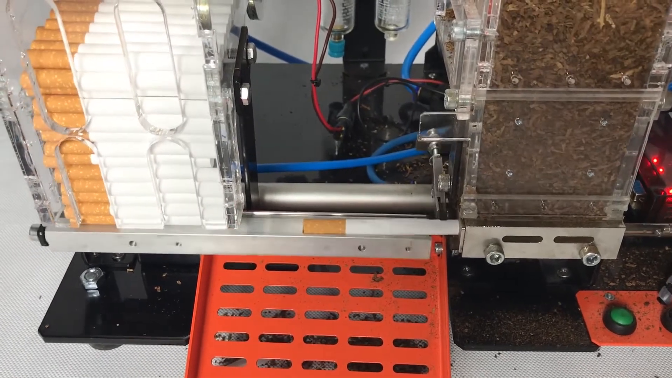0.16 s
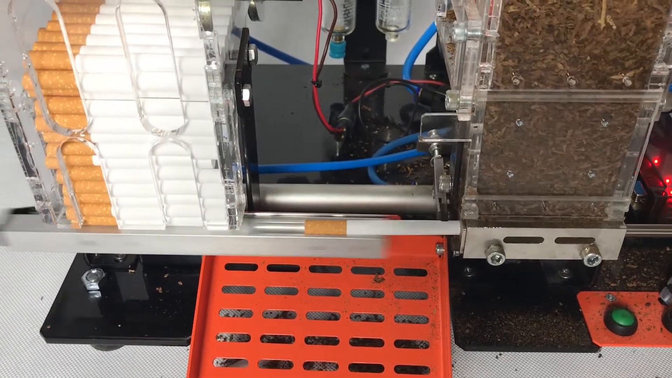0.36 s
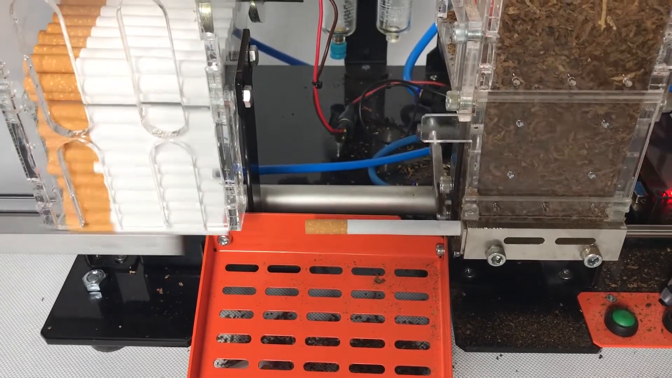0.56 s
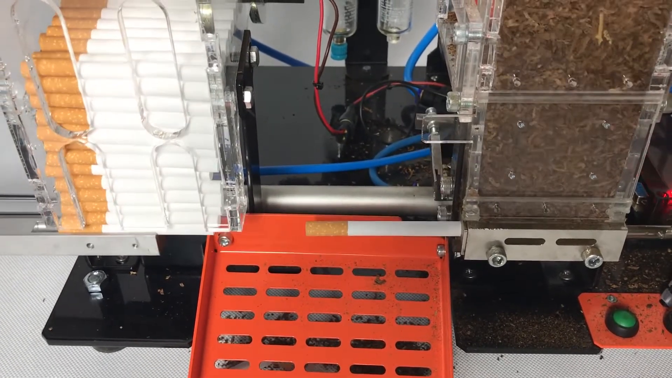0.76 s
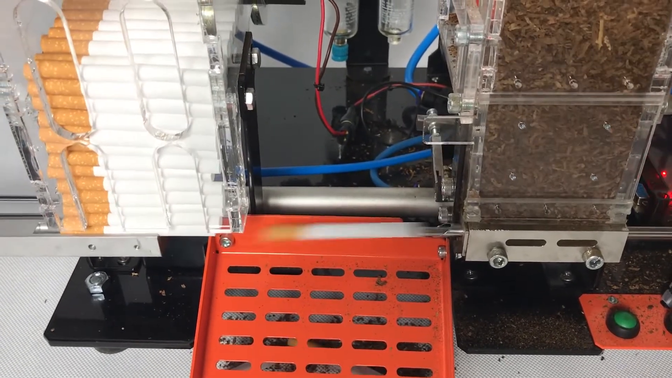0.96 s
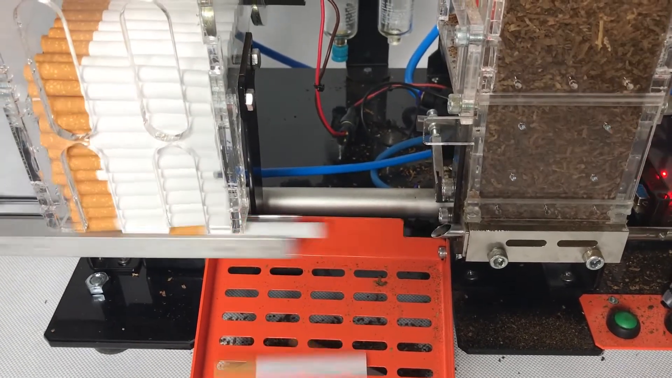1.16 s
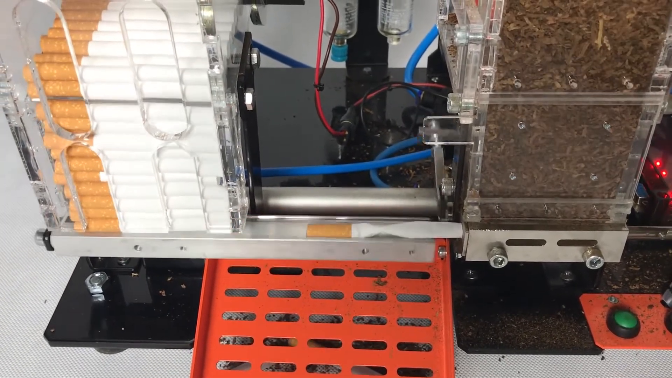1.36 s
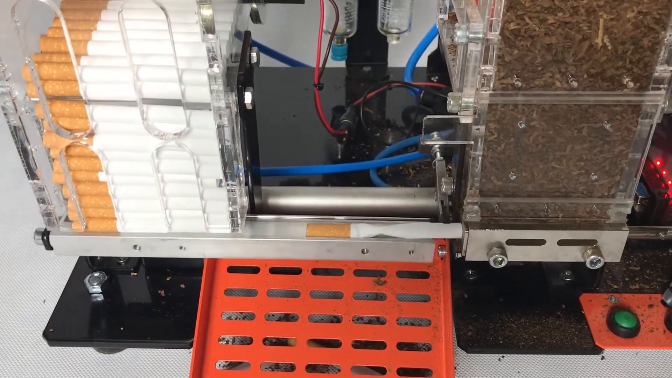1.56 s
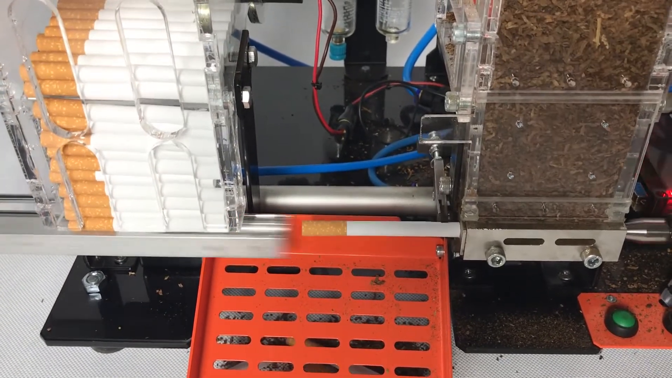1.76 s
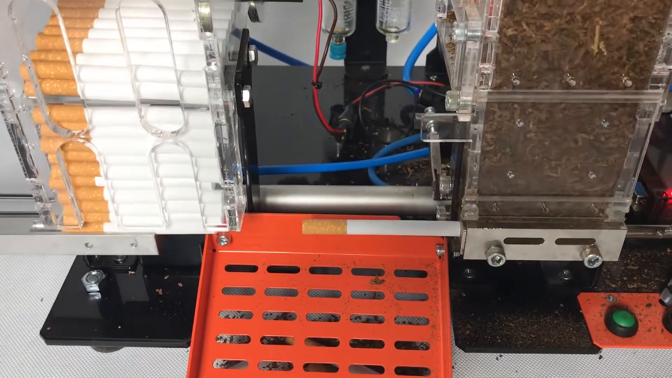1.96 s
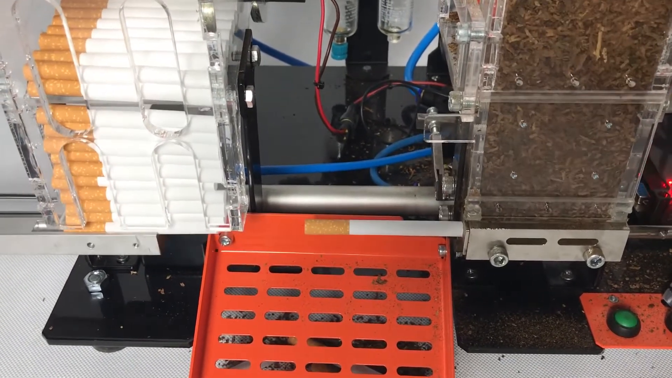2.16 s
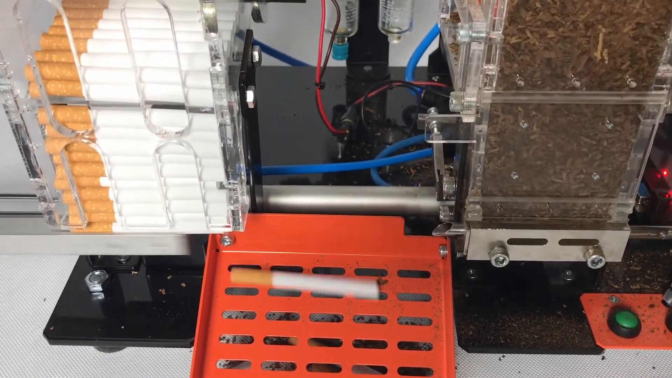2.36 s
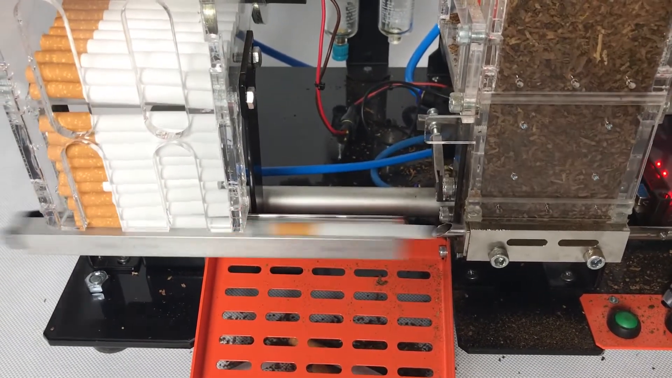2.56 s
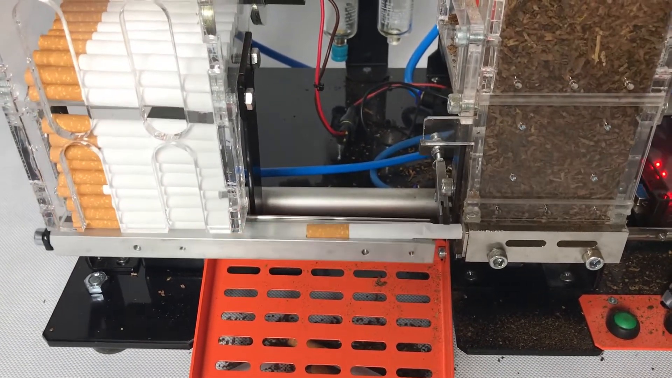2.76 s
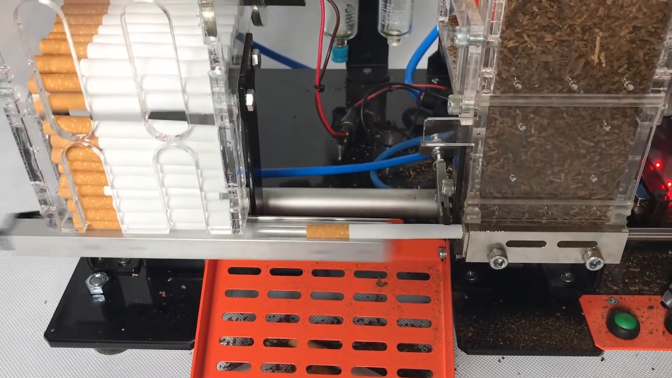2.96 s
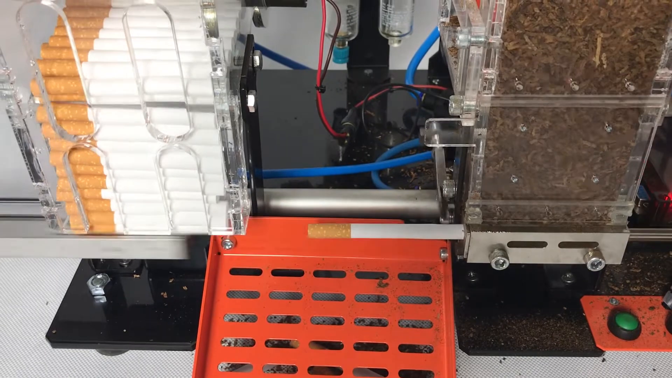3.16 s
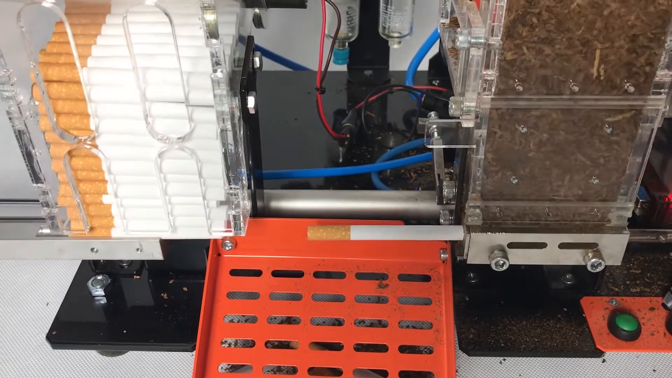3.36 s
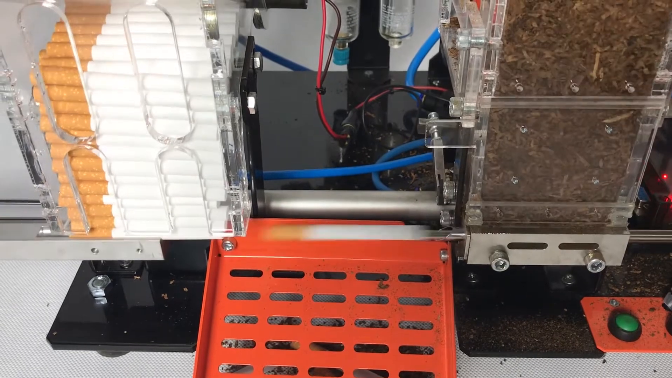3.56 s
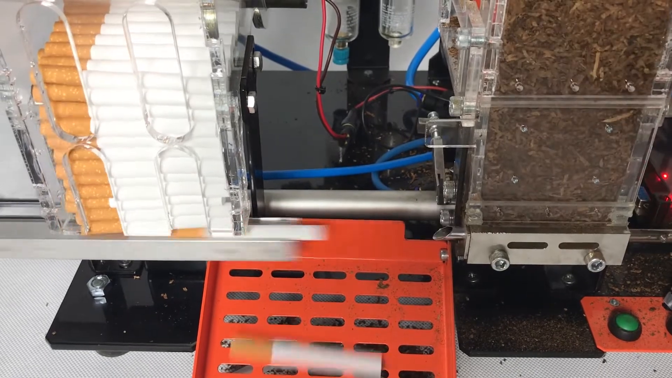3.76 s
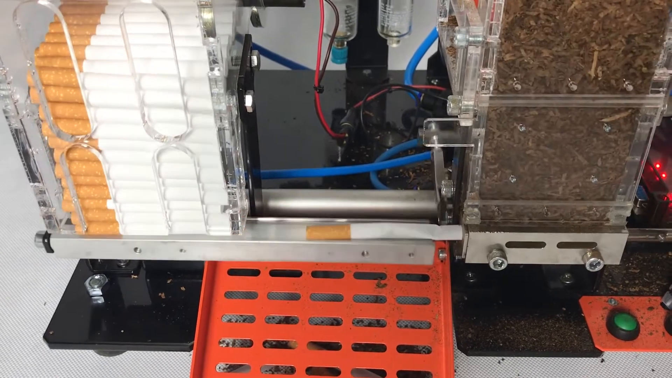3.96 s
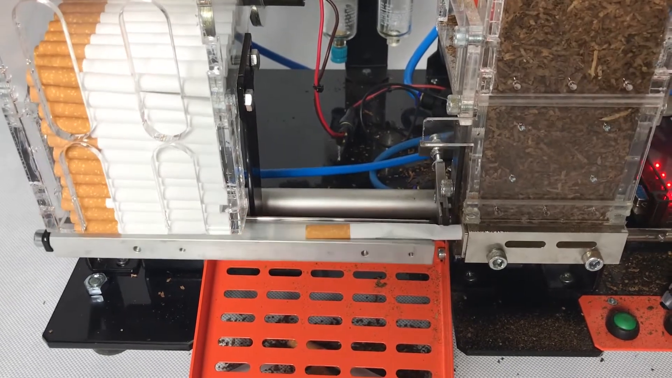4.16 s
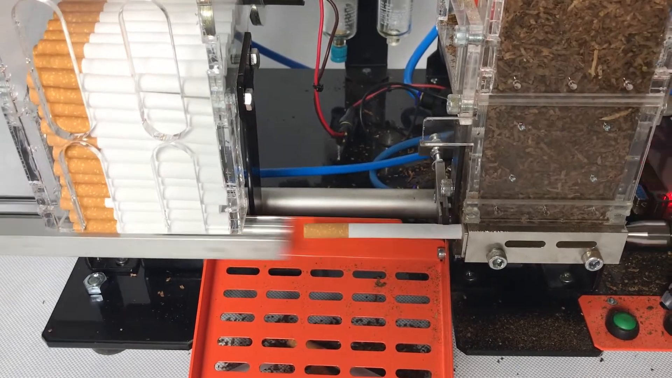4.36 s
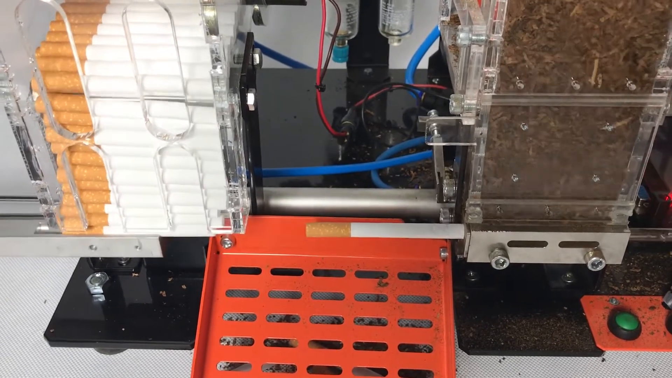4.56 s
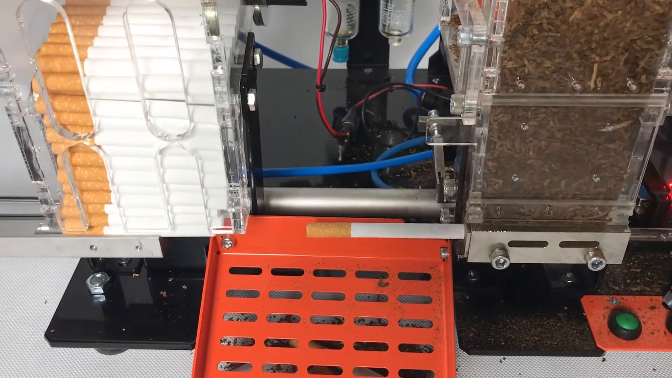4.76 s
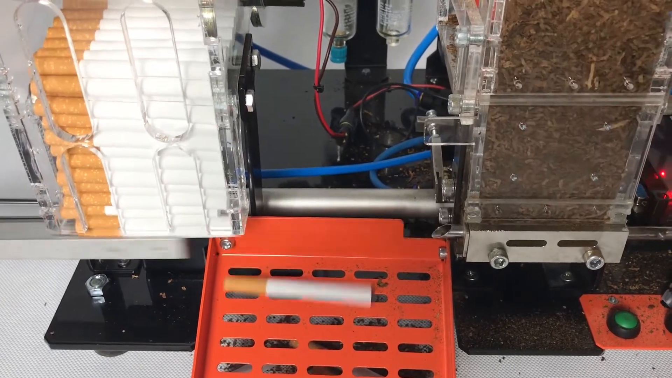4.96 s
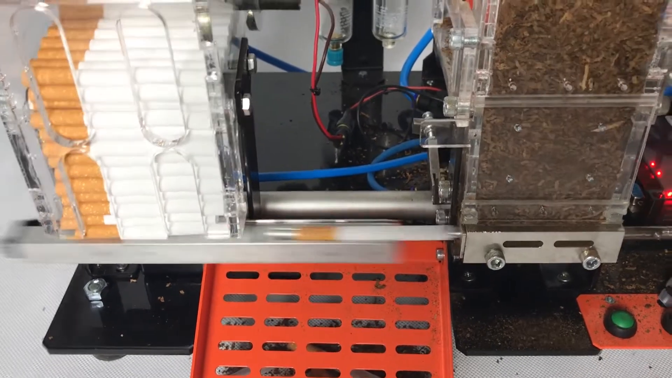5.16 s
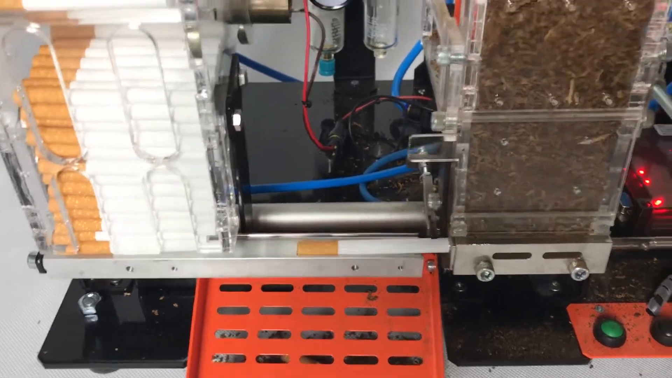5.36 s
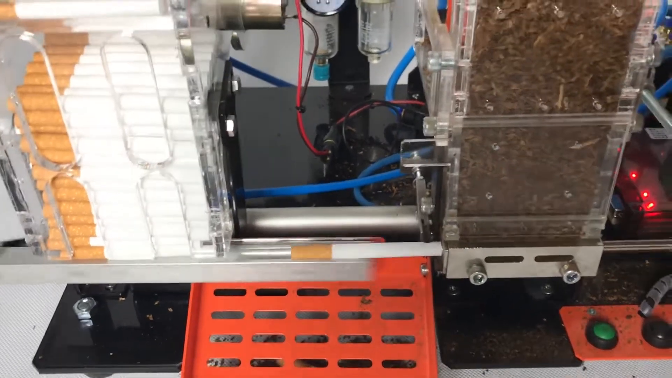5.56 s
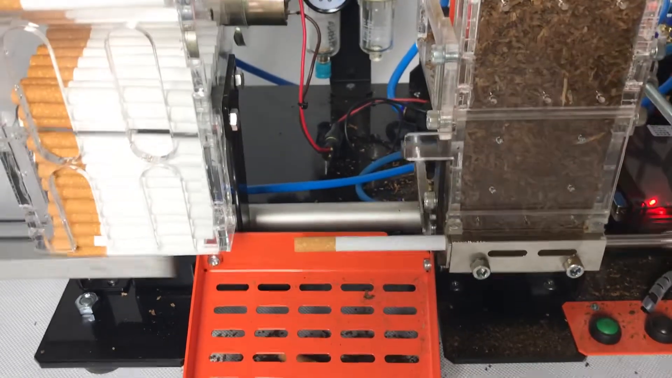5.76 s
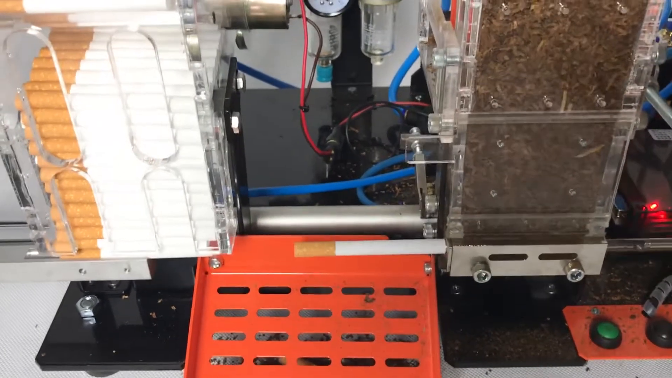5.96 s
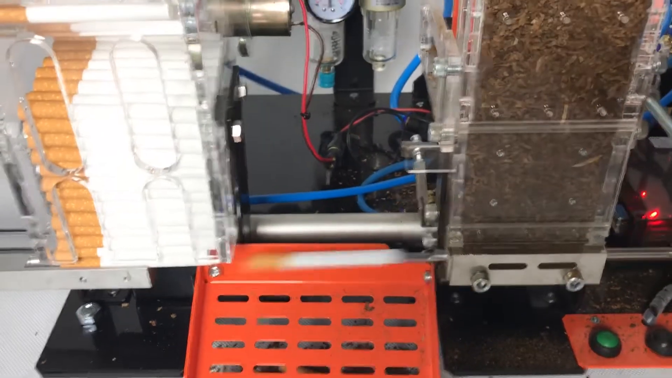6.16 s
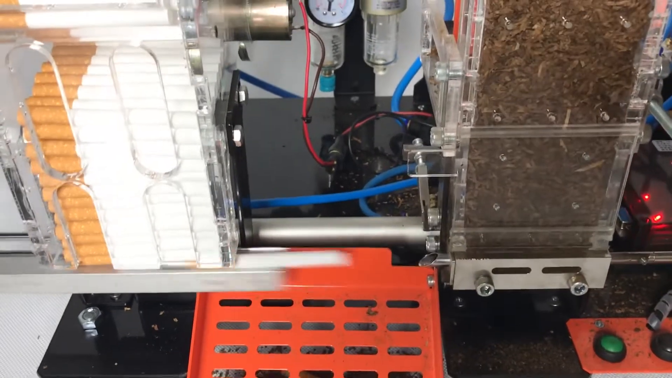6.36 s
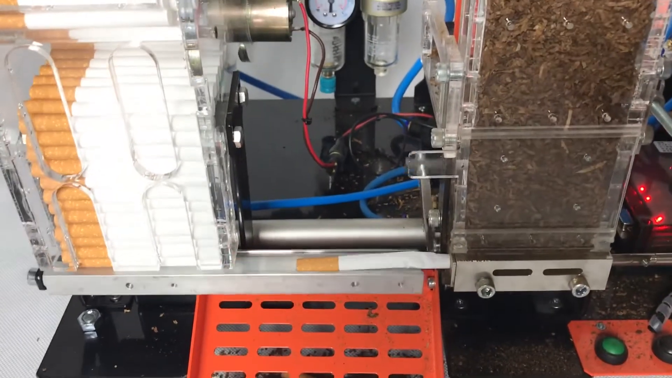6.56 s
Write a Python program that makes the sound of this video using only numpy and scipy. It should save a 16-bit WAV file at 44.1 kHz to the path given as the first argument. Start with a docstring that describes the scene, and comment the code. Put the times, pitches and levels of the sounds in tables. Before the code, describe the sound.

A small pneumatic tube-filling machine clacks and hisses in a fast, even 1.3-second cycle, pistons slamming, valves snapping, air blasting over a faint whine.

```python
"""A steady faint rush and whine come first and persist: filtered noise and wavering sines.
A small pneumatic cigarette-tube filler, close to a mono microphone, repeats a cycle every 1.3 s.
Feed and return air (shaped noise) opens the excerpt; valves snap, the slide rattles on its rails and
paper tubes tick in the hopper (noise bursts, most of them exciting damped modes).
Then cylinders vent in blasts, pistons slam into their stops and rebound, and pushing air follows."""
import sys
import numpy as np
from scipy import signal
from scipy.fft import rfft, irfft, next_fast_len
from scipy.io import wavfile
from scipy.ndimage import uniform_filter1d

SR = 44100
rng = np.random.default_rng(int(sys.argv[2]) if len(sys.argv) > 2 else 0)


def bounce(signal):
    """Save signal as a 16-bit WAV file at the path given by the first command-line argument."""
    frames = np.transpose(np.atleast_2d(signal))
    limited = np.clip(frames, -1, 1)
    pcm = np.round(limited * 32767).astype(np.int16)
    wavfile.write(sys.argv[1], SR, pcm)


N = 291942

CYCLE_S = 1.30007
CYCLE_STARTS_S = np.arange(-1, 5) * CYCLE_S  # event times below are those of one cycle
BLOW_SIZE = 8192  # samples
BLOW_S = 0.01  # a blow's level is its energy spread over this time
EDGE_HZ = 15800  # upper band limit

# Idling machine, noise density before scaling: f/Hz, level/dB per Hz
IDLE_SPECTRUM = [(24, -41), (40, -20), (68, 1.5), (105, -11.5), (402, -9), (529, 0), (790, -7), (965, 0),
                 (1070, -5.5), (1300, -2), (3060, -21), (3830, -5), (4130, -25), (12100, -32), (16000, -20)]
# Motor lines, before the common whine gain: f/Hz, level/dB
WHINE_LINES = [(947.5, -43.5), (1324, -64), (3817, -52.5)]
# Air flows: opening t/s, closing t/s, level/dB, sag/dB per s (negative: swells), dying time/s
FEED_FLOWS = [(1.13, 1.385, -33.5, -24, 0.006)]
RETURN_FLOWS = [(1.387, 1.545, -24, 11, 0.038)]
BLAST_FLOWS = [(.386, .525, -17.5, 29, 0.031), (.985, 1.068, -17, 47, 0.017)]
PUSH_FLOWS = [(.567, .725, -23.5, 5.1, 0.047), (1.087, 1.155, -25.5, 13, 0.017)]
# Hiss of each port, relative density: f/Hz, level/dB per Hz
FEED_HISS = [(150, -8), (400, -10.5), (1200, -3), (2500, -12), (4000, -4), (6500, -0.5), (8500, -10.5),
             (11000, -28.5), (14000, -8.5), (15700, -19)]
RETURN_HISS = [(150, -10), (400, -2), (1200, -2), (2500, -10.5), (4000, -0.5), (6500, -13.5), (8500, -3.5),
               (11000, -5), (14000, -15.5), (15700, -10)]
BLAST_HISS = [(150, -3), (400, -10.5), (1200, 1), (2500, -2.5), (4000, -14.5), (6500, 1), (8500, -1),
              (11000, -4), (14000, 0.5), (15700, -1)]
PUSH_HISS = [(150, -3.5), (400, -7.5), (1200, -1), (2500, 0), (4000, -9), (6500, -16.5), (8500, -13),
             (11000, -14), (14000, -6.5), (15700, -19)]
# Resonances of each port, and of the frame under every flow: f/Hz, half width/Hz, lift/dB
FEED_PEAKS = [(1590, 154, 12.8), (2696, 620, 16.4), (4980, 750, 7.9), (9640, 460, 18.5), (11100, 350, 10),
              (11620, 330, 9.9)]
RETURN_PEAKS = [(1570, 200, 9.5), (2700, 630, 17.6), (4600, 130, 13), (5266, 240, 17.4), (6100, 580, 19.9),
                (7030, 270, 12.4), (12200, 400, 9.5), (14300, 560, 11)]
BLAST_PEAKS = [(1590, 160, 8.8), (2880, 620, 18.5), (3660, 43, 14), (4370, 460, 15), (5410, 410, 19.4),
               (6150, 270, 11.5), (7030, 220, 10), (9500, 540, 12.7), (12370, 970, 8.4)]
PUSH_PEAKS = [(1650, 286, 10.1), (4500, 85, 11), (5790, 790, 17.1), (7000, 700, 14.8), (8550, 330, 11.8),
              (13500, 120, 5.6), (14620, 380, 4.5)]
FRAME_PEAKS = [(537, 64, 1.5), (970, 14, 1)]
# Valves switching: t/s, thud level/dB, thud hardness f/Hz, ring level/dB, tick level/dB,
# contact time/s, armature click level/dB
VALVE_BLOWS = [(0.3838, -13, 706, -17, -17, 0.0036, -28.5), (0.5648, -18.5, 524, -16.5, -37, 0.0029, -46),
               (0.5866, -19, 510, -22, -27, 0.002, -40), (0.785, -17, 550, -20.5, -22, 0.0025, -28),
               (.9840, -15, 700, -20.5, -17, 0.0031, -35), (1.0849, -15.5, 636, -19, -16, 0.0064, -36),
               (1.3853, -13.5, 775, -16, -16, .004, -30)]
# Slide and clamp rattling on their way, and valves chattering just after they switch: t/s, thud level/dB, #
# thud hardness f/Hz, ring level/dB, tick level/dB, contact time/s
RATTLES = [(.5440, -40, 500, -24.5, -48, .014), (.7290, -48, 401, -14, -56, 0.0039),
           (0.743, -45, 396.6, -24.5, -28, 0.012), (.8005, -31, 398.8, -24, -36.5, 0.0038),
           (1.404, -27.5, 197, -17, -42, 0.0088), (1.5480, -36.5, 300, -26, -53, 0.019)]
# Paper tubes shifting, before the common gain and scatter: t/s, level/dB
TUBE_TOUCHES = [(.252, -22), (.318, -25), (.341, -23), (0.364, -25.5), (0.853, -25.5), (.967, -27)]
# Pistons reaching their stops: t/s, thud level/dB, thud hardness f/Hz, ring level/dB, tick level/dB,
# contact time/s, rebound level/dB
STOP_BLOWS = [(.3950, -13.5, 1520, -20, -20, .0032, -20.5), (0.5645, -18, 1630, -18, -18.5, .0015, -27.5),
              (0.6966, -13, 1410, -16, -36, 0.0047, -14), (0.8966, -12, 1470, -18, -24, .0054, -11.5),
              (1.0669, -15, 1280, -20, -23.5, 0.0014, -23)]
# Modes of each struck part, relative levels: f/Hz, width/Hz, level/dB
VALVE_MODES = [(540, 31, -35), (1100, 26, -41), (1606, 93, 16), (1860, 290, -34), (2650, 100, 10),
               (2620, 160, 9.5)]
RAIL_MODES = [(318, 23, -27), (447, 14, -15), (556, 49, 5), (857, 60, 2), (970, 90, 5.5), (1149, 65, 4),
              (1374, 58, 1), (1655, 43, -3.5), (2134, 32, -6), (2460, 380, -1), (3575, 62, -2.5),
              (4210, 60, -7)]
STOP_MODES = [(689, 18, 1.5), (1067, 50, 6.5), (1390, 190, 3), (1543, 61, 4), (1870, 77, 1),
              (2400, 180, -16)]
BENCH_MODES = [(57, 16, 4.5), (65.6, 21, 3), (83, 26, -11), (123.4, 6.8, 0.5)]
# Relative spectrum of the frame's thud: f/Hz, level/dB
THUD_SPECTRUM = [(20, -37), (40, -11.5), (60, -2.5), (110, 1), (160, 1), (230, -9), (305, 0.5), (450, -4.5),
                 (600, -7), (1000, 0), (1600, -5.5)]
# Relative spectrum of a light tick: f/Hz, level/dB
TICK_SPECTRUM = [(500, -22), (1800, 5.5), (3000, 7.5), (3900, -9.5), (5700, 6), (8000, -0.5), (9800, 1.5),
                 (11500, -1.5), (16000, 1.5)]
# Reverberation of the workroom: f/Hz, t60/s
ROOM_T60 = [(100, 0.25), (500, 0.39), (1500, 0.45), (5000, 0.49), (14000, 0.29)]

# An armature clicks just before its valve; thud and ring are relative to the click
ARMATURE_LEAD_S, ARMATURE_CONTACT_S, ARMATURE_HARD_HZ = 0.0058, 0.0019, 400
ARMATURE_THUD_DB, ARMATURE_RING_DB = -7, -6
# A piston nudges its stop just before the blow and rebounds just after it
NUDGE_LEAD_S, NUDGE_DB, NUDGE_HARD_HZ = 0.0099, -16.5, 450  # level relative to the rebound
REBOUND_LAG_S, REBOUND_HARD_HZ = 0.0092, 320
# Shared by nudge and rebound; levels relative to each touch
BOUNCE_THUD_DB, BOUNCE_RING_DB, BOUNCE_TICK_DB, BOUNCE_CONTACT_S = -12, -6.5, -7.5, 0.0075
TUBE_SCATTER_S, TUBE_SPREAD_DB = 0.005, 2.5


def amp(db):
    """Level definition: amplitude gain = 10^(dB / 20)."""
    return 10 ** (np.asarray(db) / 20)


def unit(x):
    """Power normalization: scales a signal to rms 1."""
    return x / np.sqrt(np.mean(x ** 2) + 1e-20)


def unit_blow(x):
    """Energy normalization: scales a short sound to a 0 dB blow."""
    return x * np.sqrt(BLOW_S * SR / (np.sum(x ** 2) + 1e-20))


def read(points, hz):
    """Logarithmic pitch scale: interpolates a table along log frequency."""
    f, value = np.transpose(points)
    return np.interp(np.log(hz + 1), np.log(f + 1), value)


def add(mix, s, sound):
    """Superposition: adds a sound at time s, cutting what falls outside."""
    start = round(s * SR)
    sound = sound[max(-start, 0):]
    part = mix[max(start, 0):][:len(sound)]
    part += sound[:len(part)]


def colour(x, spectrum, peaks=()):
    """Linear filtering: multiplies the spectrum by a response lifted at its resonances."""
    size = next_fast_len(len(x))
    hz = np.fft.rfftfreq(size, 1 / SR)
    db = read(spectrum, hz)
    for f, half_width, lift in peaks:
        db = db + lift * np.exp(-((hz - f) / half_width) ** 2)
    return irfft(rfft(x, size) * amp(db), size)[:len(x)]


def idle(noise_db=-39, whine_db=-1, waver_hz=6):
    """Frequency modulation: motor lines waver by slow noise over a steady broadband rush."""
    t = np.arange(N) / SR
    whine = np.zeros(N)
    for hz, db in WHINE_LINES:
        drift_hz = waver_hz * unit(uniform_filter1d(rng.standard_normal(N), size=1500))
        turns = hz * t + np.cumsum(drift_hz) / SR
        whine += amp(db) * np.sqrt(2) * np.sin(2 * np.pi * turns)
    rush = unit(colour(rng.standard_normal(N), IDLE_SPECTRUM))
    return amp(noise_db) * rush + amp(whine_db) * whine


def echoes(t60s, length_s):
    """Reverberation: sparse reflections of random sign, decaying at each band's t60; energy 1."""
    size = int(length_s * SR)
    taps = rng.choice([-1., 1.], size) * (rng.random(size) < 1 / 10)
    hz, t, bands = signal.stft(taps, SR, nperseg=256)
    decay = amp(-60 * t / read(t60s, hz)[:, None])
    tail = signal.istft(bands * decay, SR, nperseg=256)[1]
    return tail / np.linalg.norm(tail)


def air(rows, hiss, peaks, flutter):
    """Jet noise: a gated turbulent flow excites its port and bounces between nearby plates."""
    flow, t = np.zeros(N), np.arange(SR // 2) / SR
    for opens, closes, db, sag, dying_s in rows:
        opening = 1 - np.exp(-t / 0.00057)
        closing = np.exp(-np.maximum(t - (closes - opens), 0) / dying_s)
        for start in CYCLE_STARTS_S:
            add(flow, start + opens, amp(db - sag * t) * opening * closing)
    jet = colour(rng.standard_normal(N), hiss, [*peaks, *FRAME_PEAKS])
    jet += 0.55 * signal.oaconvolve(jet, echoes([(1, 0.12)], 0.06))[:N]  # plates: t60 0.12 s
    turbulence = unit(uniform_filter1d(rng.standard_normal(N), size=100))
    return flow * unit(jet) * (1 + flutter * turbulence)


def feed_air():
    """Jet noise of the feed: its level swells while the port is open."""
    return air(FEED_FLOWS, FEED_HISS, FEED_PEAKS, flutter=0.11)


def return_air():
    """Jet noise of the return: its level sags as the cylinder empties."""
    return air(RETURN_FLOWS, RETURN_HISS, RETURN_PEAKS, flutter=0.14)


def ring(x, modes):
    """Modal superposition: drives damped resonances, each with its share of the blow's energy."""
    total = np.zeros(len(x))
    for hz, width, db in modes:
        b, a = signal.iirpeak(hz, hz / width, SR)
        total += amp(db) * unit_blow(signal.lfilter(b, a, x))
    return unit_blow(total)


def thud(hard_hz, lag_turns=0.693, bench_db=-14):
    """Dispersion of bending waves: highs arrive first, the bass trails and rocks the bench."""
    hz = np.fft.rfftfreq(BLOW_SIZE, 1 / SR) + 1
    gain = amp(read(THUD_SPECTRUM, hz)) / np.hypot(1, (hz / hard_hz) ** 4)
    # This phase delays each frequency by lag_turns / f
    wave = irfft(gain * np.exp(-2j * np.pi * lag_turns * np.log(hz)))
    wave = unit_blow(wave * signal.windows.hann(2 * BLOW_SIZE)[BLOW_SIZE:])
    return unit_blow(wave + amp(bench_db) * ring(wave, BENCH_MODES))


def blows(rows, modes, alike, tick_s, rise_s, play_s, vary_db=0.3):
    """Impact excitation: a thud, a crunch of contacts ringing the part, and a tick."""
    out, t = np.zeros(N), np.arange(BLOW_SIZE) / SR
    rise = 1 - np.exp(-t / rise_s)
    for s, thud_db, hard_hz, ring_db, tick_db, contact_s, *_ in rows:
        body = amp(thud_db) * thud(hard_hz)
        habit = rng.standard_normal(BLOW_SIZE)  # the part of the crunch shared by every cycle
        for start in CYCLE_STARTS_S:
            crunch = np.sqrt(alike) * habit + np.sqrt(1 - alike) * rng.standard_normal(BLOW_SIZE)
            clank = ring(crunch * rise * np.exp(-t / contact_s), modes)
            tick = unit_blow(colour(crunch, TICK_SPECTRUM) * rise * np.exp(-t / tick_s))
            force = amp(vary_db * rng.standard_normal())
            slack_s = play_s * rng.standard_normal()  # loose parts land a little early or late
            sound = body + force * (amp(ring_db) * clank + amp(tick_db) * tick)
            add(out, start + s + slack_s, sound)
    return out


def armature_clicks():
    """Light impact: an armature click announces every valve and rings the rail modes."""
    rows = []
    for s, *_, click_db in VALVE_BLOWS:
        rows.append((s - ARMATURE_LEAD_S, click_db + ARMATURE_THUD_DB, ARMATURE_HARD_HZ,
                     click_db + ARMATURE_RING_DB, click_db, ARMATURE_CONTACT_S))
    return blows(rows, RAIL_MODES, alike=0.47, tick_s=0.0089, rise_s=0.00059, play_s=0.0002)


def valve_snaps():
    """Impact excitation of the valve modes by each switching valve."""
    return blows(VALVE_BLOWS, VALVE_MODES, alike=0.5, tick_s=0.0082, rise_s=0.00027, play_s=0.00005)


def loose_contacts(rows):
    """Irregular contact: loose parts ring the rails, little alike from cycle to cycle."""
    return blows(rows, RAIL_MODES, alike=0.13, tick_s=0.0071, rise_s=0.00042, play_s=0.0005)


def rattles():
    """Irregular contact of the slide and clamp on their way, and of valves chattering just after switching."""
    return loose_contacts(RATTLES)


def tubes(gain_db=-11, decay_s=0.0042, body_db=-5):
    """Random light impacts: paper tubes settle at the same points, never quite alike."""
    out, t = np.zeros(N), np.arange(BLOW_SIZE) / SR
    for start in CYCLE_STARTS_S:
        for s, db in TUBE_TOUCHES:
            late, force = rng.standard_normal(2)
            touch = rng.standard_normal(BLOW_SIZE) * np.exp(-t / decay_s)
            tick = unit_blow(colour(touch, TICK_SPECTRUM) * (t < 1 / 20))
            sound = tick + amp(body_db) * ring(touch, RAIL_MODES)
            level_db = db + gain_db + TUBE_SPREAD_DB * force
            add(out, start + s + TUBE_SCATTER_S * late, amp(level_db) * sound)
    return out


def stop_bounces():
    """Restitution: a faint nudge takes up the slack before each stop, a louder rebound follows it."""
    touches = [(-NUDGE_LEAD_S, NUDGE_DB, NUDGE_HARD_HZ), (REBOUND_LAG_S, 0, REBOUND_HARD_HZ)]
    rows = []
    for s, *_, rebound_db in STOP_BLOWS:
        for offset_s, touch_db, hard_hz in touches:
            db = rebound_db + touch_db
            rows.append((s + offset_s, db + BOUNCE_THUD_DB, hard_hz,
                         db + BOUNCE_RING_DB, db + BOUNCE_TICK_DB, BOUNCE_CONTACT_S))
    return loose_contacts(rows)


def blast_air():
    """Jet noise of the vents: loud blasts sag steeply as the cylinders empty."""
    return air(BLAST_FLOWS, BLAST_HISS, BLAST_PEAKS, flutter=0.13)


def stop_slams():
    """Impact excitation of the stop modes by the arriving pistons."""
    return blows(STOP_BLOWS, STOP_MODES, alike=0.4, tick_s=0.0047, rise_s=0.00087, play_s=0.00005)


def push_air():
    """Jet noise of the push: a gently sagging flow with little flutter."""
    return air(PUSH_FLOWS, PUSH_HISS, PUSH_PEAKS, flutter=0.029)


def scene(room_db=-14):
    """Superposition of direct sound and reverberation: only the knocks excite the small workroom."""
    background = idle()
    hiss = feed_air() + return_air() + blast_air() + push_air()
    knocks = armature_clicks() + valve_snaps() + rattles() + tubes()
    knocks += stop_bounces() + stop_slams()
    room = signal.oaconvolve(knocks, echoes(ROOM_T60, 1 / 2))[:N]
    mono = knocks + hiss + amp(room_db) * room + background
    return np.array([mono, mono])


def record(dry):
    """Saturation and band limiting: peaks round off at full scale, then a low-pass follows."""
    rounded = dry / (1 + dry ** 6) ** (1 / 6)
    low_pass = signal.firwin(401, EDGE_HZ, window=("kaiser", 9), fs=SR)
    return signal.oaconvolve(rounded, low_pass[None], "same")


dry = scene()
out = record(dry)
bounce(out)
```